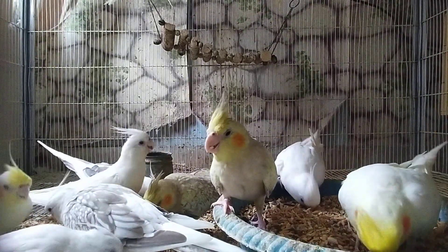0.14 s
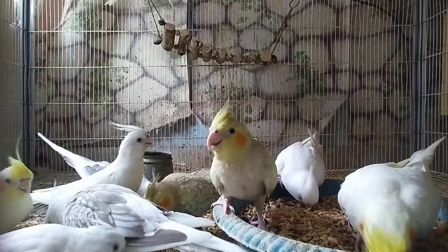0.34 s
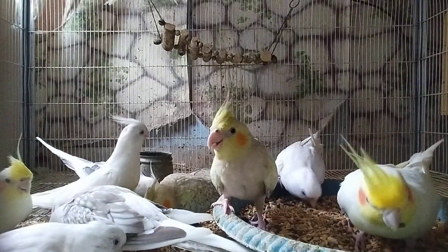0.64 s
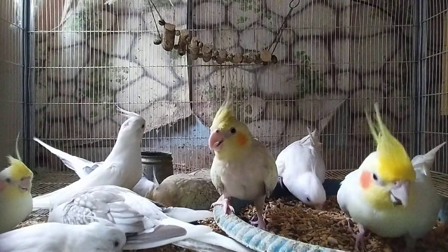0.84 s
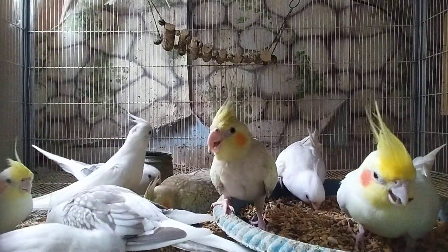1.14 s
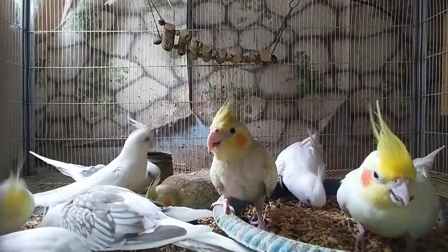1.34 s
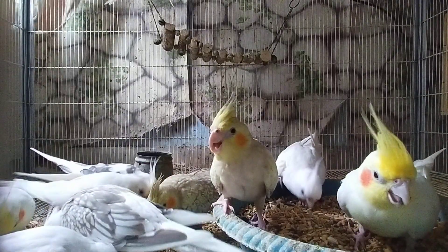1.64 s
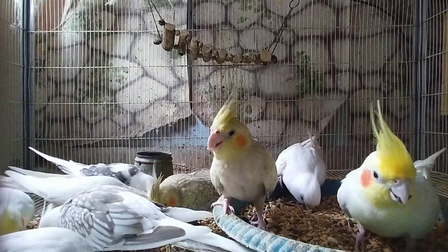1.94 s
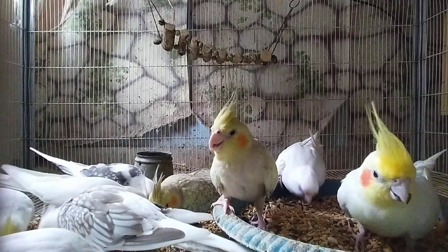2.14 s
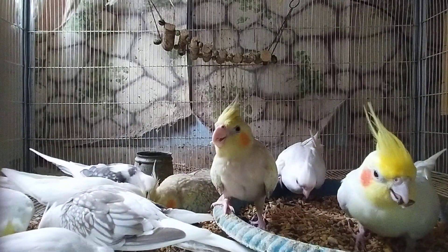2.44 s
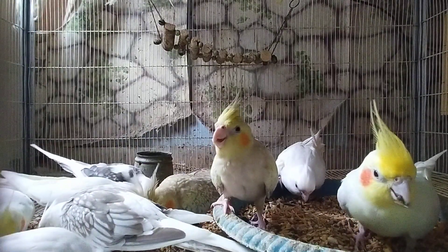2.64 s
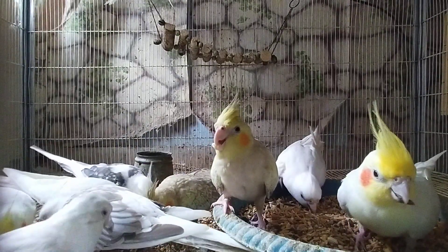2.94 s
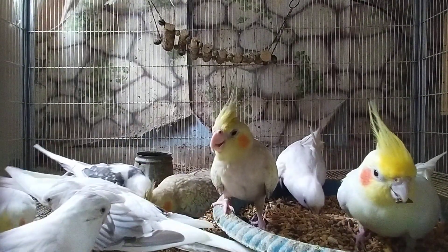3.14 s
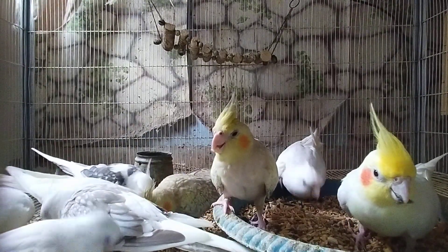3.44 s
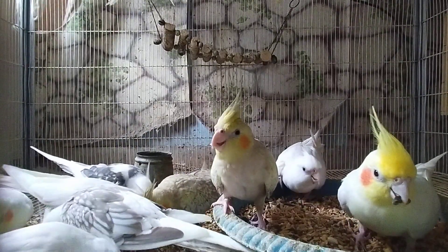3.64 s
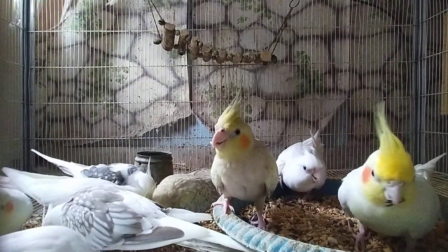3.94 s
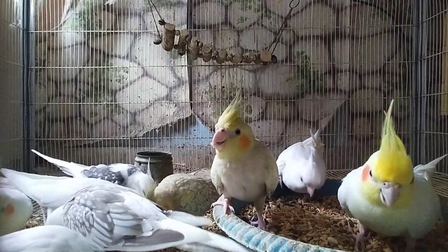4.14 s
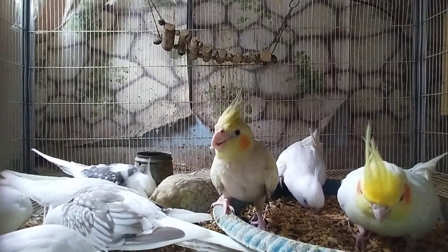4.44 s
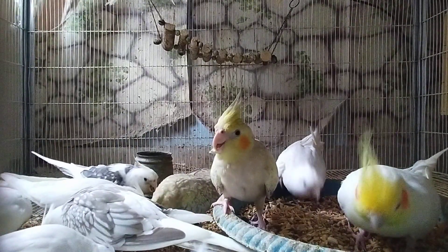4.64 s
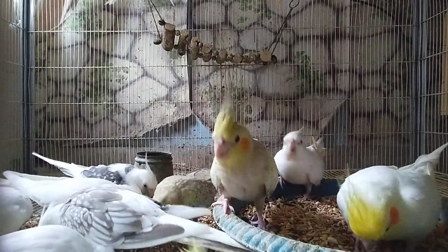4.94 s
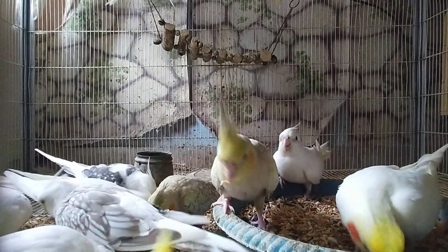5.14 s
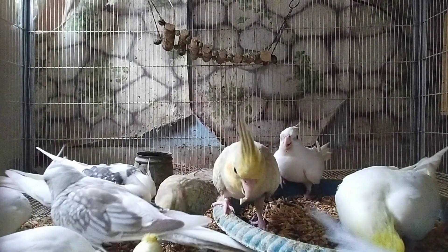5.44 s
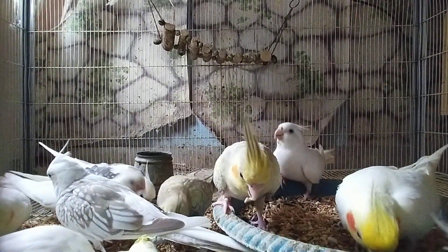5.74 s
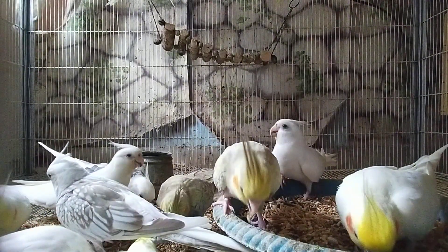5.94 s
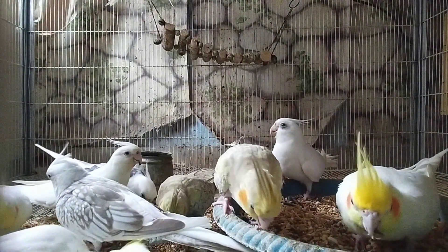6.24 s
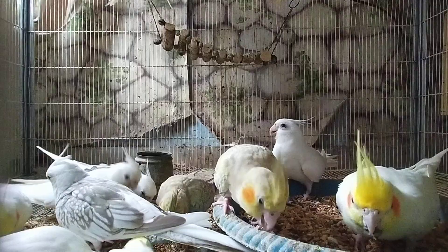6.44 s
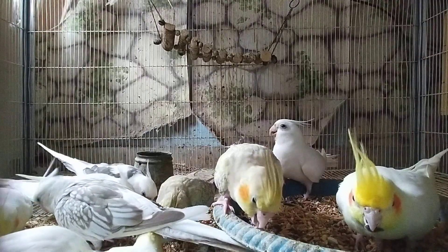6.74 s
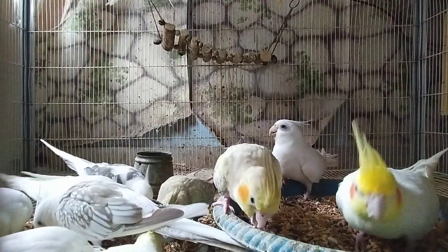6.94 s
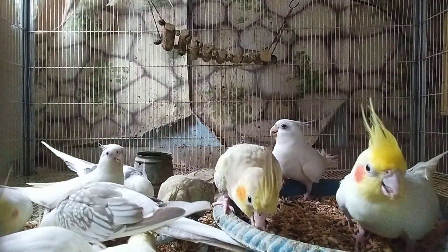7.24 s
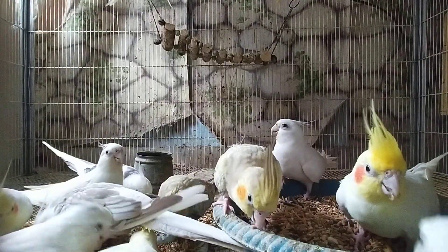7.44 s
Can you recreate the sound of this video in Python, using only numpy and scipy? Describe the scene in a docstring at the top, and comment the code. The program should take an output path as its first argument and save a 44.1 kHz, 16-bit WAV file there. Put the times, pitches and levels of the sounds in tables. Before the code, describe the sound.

Faint room noise and low rumble open the scene, with brittle seed cracks, a soft bump at 0.2 s and a light hollow tap on a tray near 0.6. A weak raspy squawk comes at 0.8, a stronger buzzing, rising one at 1.0. At 1.9 a harsh squawk runs into a loud, clear arched whistle at 2.0; another whistle follows at 2.6. A squawk at 3.15 and whistle at 3.4 lead to a lull with seed clicks, feather swishes and faint far hoots. From 5.15 to 5.9 whistles and squawks crowd together and overlap, the last one lower and softer. Bumps, sharp seed cracks and a feathery swish sit around 6.1, then quiet nibbling. Two loud overlapping whistles burst out at 7.2, and a short squawk starts at 7.5. Everything is close, in a small reflective room.

```python
"""Room noise and a low rumble are heard first, then beaks cracking seed, low bumps and a tap on a tray.
Cockatiels call in a cage in a small hard-walled room, close to the microphone: raspy, buzzing squawks and
loud, clean, arched whistles, some overlapping, with faint far hoots and swishes of feathers between.
Calls are gliding harmonic tones shaped by throat resonances; noises are filtered noise under envelopes;
bumps, taps and hoots are sines. Discrete reflections and a diffuse tail supply the room."""
import sys
import numpy as np
from scipy import signal
from scipy.fft import rfft, irfft
from scipy.io import wavfile
from scipy.ndimage import uniform_filter1d

SR = 44100
rng = np.random.default_rng(int(sys.argv[2]) if len(sys.argv) > 2 else 0)


def materialize(psi):
    """Save the field psi as 16-bit PCM at rate SR to the path in sys.argv[1].

    A 1-D psi becomes a single channel; in a 2-D psi each row is a channel.
    """
    bounded = np.clip(np.atleast_2d(psi).T, -1, 1)
    quanta = np.round(bounded * 32767).astype(np.int16)
    wavfile.write(sys.argv[1], SR, quanta)


N = 335160  # length [samples]


def gain_of(db):
    """Level definition: an amplitude ratio is 10 to the power of decibels over 20."""
    return 10 ** (np.asarray(db) / 20)


def evened(x):
    """Power normalisation: scales a signal to rms 1."""
    return x / np.sqrt(np.mean(x ** 2) + 1e-20)


def read(points, hz):
    """Logarithmic frequency scale: interpolates a table's values between its frequencies."""
    f, value = np.transpose(points)
    return np.interp(np.log(hz + 1), np.log(f + 1), value)


def add(mix, s, sound):
    """Superposition: adds a sound to the mix, in place, from time s."""
    part = mix[max(round(s * SR), 0):][:len(sound)]
    part += sound[:len(part)]


def noise(colour):
    """Spectral shaping: white noise is weighted by a spectrum, then scaled to rms 1."""
    hz = np.fft.rfftfreq(N, 1 / SR)
    spectrum = rfft(rng.standard_normal(N)) * gain_of(read(colour, hz))
    return evened(irfft(spectrum, N))


def wander(rate_hz, size=32768):
    """Band-limited random fluctuation: low-passed noise of rms 1, varying up to about rate_hz."""
    hz = np.fft.rfftfreq(size, 1 / SR)
    spectrum = rfft(rng.standard_normal(size)) * np.exp(-(hz / rate_hz) ** 2)
    return evened(irfft(spectrum, size))


# spectrum of the steady room noise: (frequency [Hz], relative density [dB])
AIR_SPECTRUM = [(24, -41), (40, -35.5), (106, -10), (256, 3), (491, -8.5), (790, -11.5), (896, -13.5),
                (1210, -10.5), (2570, -25.5), (4030, -37), (6170, -44), (7540, -36.5), (11600, -49.5),
                (14800, -37), (16000, -45)]


def room_noise(level_db=-42):
    """Stationary noise: a constant spectrum at a constant rms level."""
    return gain_of(level_db) * noise(AIR_SPECTRUM)


# spectrum of movement near the microphone: (frequency [Hz], relative density [dB])
RUMBLE_SPECTRUM = [(21, -54.5), (35, -37.5), (84, -5), (119, 0.5), (166, -3.5), (291, -16), (456, -28.5),
                   (496, -38), (600, -25.5), (780, -56), (1320, -120)]
# its louder swells: (time [s], relative peak level [dB], time to fall 10 dB [s])
RUMBLE_SWELLS = [(.08, -33, 0.12), (.23, -26.5, 0.08), (.7, -36, .12), (.88, -35, .04), (1.195, -21.5, .05),
                 (1.41, -37.5, 0.2), (1.69, -34, 0.13), (1.98, -31.5, .08), (2.86, -32.5, 0.05),
                 (3.43, -28, 0.06), (4.51, -32.5, 0.02), (4.68, -29, 0.07), (4.99, -32.5, 0.05),
                 (5.74, -37, 0.25), (6.1, -25, 0.06), (6.58, -29.5, 0.05), (6.77, -32, 0.1),
                 (6.94, -31, 0.1)]
REST_DB, RESTLESS_DB, RESTLESS_HZ = -46.5, 3.5, 5.8  # faint stirring: relative level, spread, rate


def rumble(level_db=-2):
    """Amplitude modulation: low noise follows the higher of a restless floor and each swell."""
    t = np.arange(N) / SR
    stir_db = REST_DB + RESTLESS_DB * wander(RESTLESS_HZ, size=N)
    for s, db, width in RUMBLE_SWELLS:
        stir_db = np.maximum(stir_db, db - 10 * abs(t - s) / width)
    return gain_of(stir_db + level_db) * noise(RUMBLE_SPECTRUM)


# beaks cracking seed: (time [s], relative level [dB])
SEED_CRACKS = [(0.0844, -36), (0.1694, -43), (0.316, -38.5), (0.3631, -44), (0.569, -42), (1.4174, -44),
               (1.5988, -47), (2.2468, -29), (2.394, -38), (2.9386, -35.5), (2.9791, -32), (4.0824, -36),
               (4.1214, -36.5), (4.187, -39.5), (4.2268, -37), (4.291, -36.5), (4.3144, -42.5),
               (6.118, -30), (6.128, -25), (6.142, -31), (6.5904, -37), (6.7171, -37.5), (6.7744, -38.5),
               (6.803, -36), (6.8314, -41), (6.8773, -41)]
# spectrum of cracks and crumbs: (frequency [Hz], relative level [dB])
CRACK_SPECTRUM = [(1000, -21.5), (3000, -19), (5000, -6), (7800, -0.5), (10500, -12.5), (13000, -1),
                  (15500, 5.5)]


def seeds(level_db=-7, decay_s=0.0036, crumbs_per_s=16, crumb_db=-60):
    """Impulsive excitation: cracks and random husk crumbs become decaying bursts of noise."""
    force, t = np.zeros(N), np.arange(SR // 30) / SR
    for s, db in SEED_CRACKS:
        add(force, s, gain_of([db + level_db]))
    falls = rng.random(N) < crumbs_per_s / SR
    force += falls * gain_of(crumb_db + 4 * rng.standard_normal(N))
    envelope = signal.oaconvolve(force, np.exp(-t / decay_s))[:N]
    return envelope * noise(CRACK_SPECTRUM)


# soft bumps: (time [s], relative level [dB], pitch [Hz])
SOFT_BUMPS = [(0.221, -22.5, 151), (1.982, -26, 103), (3.414, -24, 120), (4.972, -21, 136),
              (6.073, -21, 119.7), (6.576, -20.5, 110)]


def bumps(level_db=-1, rise_s=0.0065):
    """Damped oscillation: a few low cycles swell and die under a critically damped envelope."""
    out, t = np.zeros(N), np.arange(SR // 8) / SR
    for s, db, hz in SOFT_BUMPS:
        envelope = t / rise_s * np.exp(1 - t / rise_s)
        add(out, s - .004, gain_of(db + level_db) * envelope * np.sin(2 * np.pi * hz * t))
    return out


# a beak tapping the tray: (time [s], direct peak level [dB])
TRAY_TAPS = [(.589, -28.5)]
# modes of the tray: (frequency [Hz], relative level [dB], time to fall 60 dB [s])
TRAY_MODES = [(600, -2, 0.057), (1110, -4, 0.059), (1365, 4, 0.032), (2540, -9, .03)]


def taps():
    """Modal synthesis: a light peck sounds the tray's modes as exponentially decaying sines."""
    out, t = np.zeros(N), np.arange(SR // 10) / SR
    ring = sum(gain_of(db - 60 * t / t60) * np.sin(2 * np.pi * hz * t) for hz, db, t60 in TRAY_MODES)
    for s, db in TRAY_TAPS:
        add(out, s, gain_of(db) * ring / abs(ring).max())
    return out


# colour that throat and beak give the overtones: (frequency [Hz], gain [dB])
THROAT_RESPONSE = [(600, -48), (1600, -14), (2500, 4), (3600, 2.5), (4600, -5), (5400, -9), (6200, -5.5),
                   (7200, -1), (8800, -3), (9600, -13.5), (10300, -2), (12500, -7.5), (14500, 1),
                   (16200, -11.5)]
SHRILL_HZ, SHRILL_WIDTH_HZ = 14900, 1300  # the top resonance, its strength set call by call


def throat(hz, shrill_db):
    """Source-filter principle: gain in dB of throat and beak, with a variable top resonance."""
    return read(THROAT_RESPONSE, hz) + shrill_db * np.exp(-((hz - SHRILL_HZ) / SHRILL_WIDTH_HZ) ** 2 / 2)


def rush(fall_db, shrill_db, knee_hz=4500, size=32768):
    """Turbulence noise: air coloured by the throat, losing fall_db per octave above the knee."""
    hz = np.fft.rfftfreq(size, 1 / SR)
    colour_db = throat(hz, shrill_db) - fall_db * np.log2(np.maximum(hz / knee_hz, 1))
    return irfft(rfft(rng.standard_normal(size)) * gain_of(colour_db), size)


def glide(scoop_s, climb_s, fall_s, first_hz, knee_hz, top_hz, last_hz, bend, ease=1.3):
    """Pitch contour: time and frequency of a scoop, an easing climb and a fall steepened by bend."""
    t = np.arange(0, scoop_s + climb_s + fall_s + .004, 1 / SR)
    scoop = np.clip(t / scoop_s, 0, 1)
    climb = np.clip((t - scoop_s) / climb_s, 0, 1)
    fall = np.clip((t - scoop_s - climb_s) / fall_s, 0, 1)
    hz = first_hz + (knee_hz - first_hz) * scoop + (top_hz - knee_hz) * (1 - (1 - climb) ** ease)
    hz = hz + (last_hz - top_hz) * (fall ** 2 + fall ** bend) / 2
    return t, uniform_filter1d(hz, size=440, mode="nearest")  # muscles round the turns of pitch


def gate(t, attack_s, release_s):
    """Amplitude envelope: linear attack, hold and linear release."""
    return np.clip(np.minimum(t / attack_s, (t[-1] - t) / release_s), 0, 1)


def opening(t, length_s):
    """Onset transient: 1 at the start of a call, dropping toward 0 around length_s."""
    return np.exp(-(t / length_s) ** 4)


# how strongly the fundamental carries at each pitch: (frequency [Hz], gain [dB])
FUNDAMENTAL_CARRY = [(1250, -23), (1600, -15), (1850, -10), (2200, -6.5), (2550, -6.5), (2950, 0),
                     (3150, -2.5)]
BUZZ_DEPTH, JITTER = .03, .016  # shares of pitch that shake at full rasp
GRIT = .33  # share of overtone amplitude that shakes at rasp 1


def chirp(t, hz, tone_db, source_db, rasp, fall_db, shrill_db, buzz_hz=105, tremor=.004,
          flutter=0.61, slack_db=14, rush_db=-3, count=12):
    """Harmonic synthesis: the syrinx sweeps a tone that buzz, jitter and turbulence roughen with rasp."""
    # a clean call dulls where its pitch sags
    fall_db = fall_db + slack_db * np.maximum(1 - rasp, 0) * (1 - hz / hz.max())
    drift, shake, waver, swell = (wander(rate)[:len(t)] for rate in (60, 450, 120, 250))
    buzz = np.sin(2 * np.pi * np.cumsum(buzz_hz * (1 + .2 * drift)) / SR)
    tone_db = tone_db + read(FUNDAMENTAL_CARRY, hz)
    roughness = np.minimum(rasp, 1) * (BUZZ_DEPTH * buzz + JITTER * shake)
    hz = hz * (1 + roughness + tremor * waver)
    phase = 2 * np.pi * np.cumsum(hz) / SR
    voice = gain_of(tone_db) * np.sin(phase)
    for k in range(2, count):  # overtones slide through the throat's resonances
        level_db = source_db - fall_db * (k - 2) + throat(k * hz, shrill_db)
        level_db += 3.5 * wander(110)[:len(t)]  # each one flickers on its own
        grit = 1 + GRIT * rasp * wander(600)[:len(t)]  # and is smeared by turbulence
        audible = k * hz < SR / 2  # nothing above half the sample rate
        voice += gain_of(level_db) * grit * np.sin(k * phase) * audible
    air = rush(fall_db.min(), shrill_db)[:len(t)]
    voice += rasp * gain_of(source_db - fall_db + rush_db) * air
    throb = np.exp(rasp * flutter * (buzz + 1.8 * np.tanh(swell)) / 2)
    return np.sqrt(2) * voice * throb


# squawks start low, climb and droop, fading after a harsh start:
# (start [s], climb [s], fall [s], first pitch [Hz], top pitch [Hz], relative level [dB],
#  relative overtone level [dB], extra overtones at the start [dB], harsh time [s], change by the end [dB],
#  rasp [1 = full], base rolloff per overtone [dB], room re direct [dB], shrillness [dB])
SQUAWK_CALLS = [(.785, 0.049, 0.082, 1297, 1490, -31, -58, 4, .11, -6, .9, 9, -5, -8),
                (1.034, .14, 0.079, 1300, 2200, -17, -40.5, 0.5, .12, -6, 1, 5.1, -8.5, -22),
                (1.892, .145, 0.018, 1600, 2040, -14.5, -45, 10, .115, -12, 1.1, 3.5, -3.5, 6),
                (3.145, 0.13, 0.028, 1270, 2170, -16.5, -44, 8, .115, -14, .75, 4, -6, 9),
                (5.236, .07, .085, 1620, 2460, -12, -48, 15.5, .062, -7, .9, 8.5, -5.5, 15),
                (5.534, 0.14, 0.049, 1350, 2130, -19, -39.5, 4, .15, -3, .92, 4.5, -6, 3),
                (7.478, .005, .03, 1600, 1780, -8, -44, 2, .03, -10, .9, 5, -7, 12)]
SQUAWK_SCOOP_S, SQUAWK_BEND = .02, 1.2
SQUAWK_KNEE, SQUAWK_DROOP = 1.1, .77  # knee: times the first pitch; end of the droop: times the top
SQUAWK_FULL_HZ, SQUAWK_WEAK_DB_PER_HZ = 1420, .05  # below this pitch the voice is still weak
SQUAWK_SWELL_DB = 3.5  # the fundamental is this much weaker while the call is harsh


def squawk(start, climb_s, fall_s, first_hz, top_hz, level_db, over_db, bite_db, harsh_s, fade_db,
           rasp, rolloff_db, room_db, shrill_db):
    """Rough phonation: a rising, overtone-rich call that loses force; (start, sound, room level)."""
    t, hz = glide(SQUAWK_SCOOP_S, climb_s, fall_s, first_hz, SQUAWK_KNEE * first_hz, top_hz,
                  SQUAWK_DROOP * top_hz, SQUAWK_BEND, ease=1.05)
    weakness_db = np.maximum(SQUAWK_FULL_HZ - hz, 0) * SQUAWK_WEAK_DB_PER_HZ
    effort_db = fade_db * (t / t[-1]) ** 3 - weakness_db
    bite = opening(t, harsh_s)
    tone_db = level_db + effort_db - SQUAWK_SWELL_DB * bite
    source_db = over_db + effort_db + bite_db * bite
    voice = chirp(t, hz, tone_db, source_db, rasp, rolloff_db, shrill_db)
    return start, voice * gate(t, attack_s=.012, release_s=.012), room_db


# faint far hoots: (start [s], length [s], first pitch [Hz], last pitch [Hz], relative level [dB])
FAR_HOOTS = [(1.283, 0.61, 414, 430.6, -48), (2.613, 0.11, 435.4, 408, -33.5),
             (2.854, .14, 400.6, 438, -42.5), (3.252, 0.088, 274.4, 353, -39.5),
             (4.203, 0.31, 429.5, 395.7, -41.5)]


def hoots(waver=.015):
    """Frequency modulation: soft, nearly pure tones glide and waver slightly."""
    out = np.zeros(N)
    for s, length, first_hz, last_hz, db in FAR_HOOTS:
        hz = np.linspace(first_hz, last_hz, int(length * SR))
        hz = hz * (1 + waver * np.resize(wander(40), len(hz)))
        tone = np.sqrt(2) * np.sin(2 * np.pi * np.cumsum(hz) / SR)
        add(out, s, gain_of(db) * tone * signal.windows.tukey(len(hz), .6))
    return out


# whistles scoop to a knee, climb to the top and fall away; each starts reedy:
# (start [s], scoop [s], climb [s], fall [s], knee pitch [Hz], top pitch [Hz], bend of the fall [exponent],
#  relative level [dB], relative overtone level [dB], extra overtones at the start [dB], reedy time [s],
#  rasp after the start [1 = full], shrillness [dB])
WHISTLE_CALLS = [(2.021, .058, 0.056, .097, 2989, 3015, 12, -7.5, -43.5, 13, .048, .05, 13.5),
                 (2.637, .027, .073, .093, 2620, 3055, 3.5, -9.5, -44.5, 9, .02, 0.042, -3),
                 (3.416, .043, .123, .075, 2800, 3070, 5, -10, -45, 12, .022, .06, 16.5),
                 (5.158, .047, .086, .095, 2850, 3000, 3.6, -8.5, -46.5, 13, .02, .05, 21),
                 (5.596, .018, .091, 0.089, 2100, 2630, 3, -11, -53, 15, .055, .33, 0),
                 (5.793, .008, .02, .056, 1998, 2220, 1.2, -18.5, -56, 11, .01, .45, 8.5),
                 (7.229, .063, .052, .104, 2320, 2930, 2.6, -11.5, -50.5, 19, .074, .36, 19),
                 (7.236, .018, .122, .130, 2030, 2490, 3, -12.5, -55, 11, .04, .7, 15)]
# overtones gain as pitch sinks below the pure register: (frequency [Hz], gain [dB])
LOW_PITCH_REEDINESS = [(1550, 12), (1900, 4), (2300, -1), (3100, 0)]
WHISTLE_FIRST_HZ, WHISTLE_LAST_HZ = 1689, 1597
WHISTLE_ROLLOFF_DB, WHISTLE_ROOM_DB = 5.4, -11  # base rolloff per overtone; room re direct
WHISTLE_SWELL_DB = 4.5  # the tone is this much weaker while it is reedy
WHISTLE_BITE_RASP = .25  # rasp gained in the reedy start


def whistle(start, scoop_s, climb_s, fall_s, knee_hz, top_hz, bend, level_db, over_db, bite_db,
            reedy_s, rasp, shrill_db, release_s=0.0061):
    """Tonal phonation: an arched call turns from reedy to purer; (start, sound, room level)."""
    t, hz = glide(scoop_s, climb_s, fall_s, WHISTLE_FIRST_HZ, knee_hz, top_hz,
                  WHISTLE_LAST_HZ, bend, ease=1.35)
    bite = opening(t, reedy_s)
    tone_db = level_db - WHISTLE_SWELL_DB * bite
    source_db = over_db + bite_db * bite + read(LOW_PITCH_REEDINESS, hz) * (1 - bite)
    roughness = rasp + WHISTLE_BITE_RASP * bite
    voice = chirp(t, hz, tone_db, source_db, roughness, WHISTLE_ROLLOFF_DB, shrill_db)
    return start, voice * gate(t, attack_s=.006, release_s=release_s), WHISTLE_ROOM_DB


# swishes of feathers: (start [s], length [s], relative level [dB])
FEATHER_SWISHES = [(3.269, 0.37, -50.5), (3.929, 0.083, -62.5), (4.609, .13, -52.5), (6.037, .15, -49),
                   (6.894, 0.31, -54)]
# their spectrum: (frequency [Hz], relative level [dB])
FEATHER_SPECTRUM = [(1500, -22.5), (2400, -6.5), (3000, -1.5), (4100, -17.5), (6000, -10), (7400, 0),
                    (8800, -12.5), (10500, -27.5), (15000, -25)]


def feathers(patchy_db=4):
    """Friction noise: short swells of hiss, grainy as the vanes catch on each other."""
    level = np.zeros(N)
    for s, length, db in FEATHER_SWISHES:
        add(level, s, gain_of(db) * np.hanning(int(length * SR)))
    return level * gain_of(patchy_db * wander(150, size=N)) * noise(FEATHER_SPECTRUM)


# first reflections off floor, tray and walls: (delay [s], amplitude gain [ratio])
EARLY_ECHOES = [(.0019, 0.17), (.0043, -0.078), (.0078, 0.27), (0.0095, -.13), (0.0166, 0.2)]


def reflections(x):
    """Comb filtering: near surfaces return delayed copies, which beat against a gliding tone."""
    out = x.copy()
    for delay, gain in EARLY_ECHOES:
        add(out, delay, gain * x)
    return out


# reverberation of the room: (frequency [Hz], time to fall 60 dB [s])
ROOM_DECAY = [(300, .4), (1800, 0.22), (3000, 0.32), (4200, 0.18), (7000, 0.33), (15000, 0.11)]


def room(x, onset_s=0.0032):
    """Diffuse reverberation: convolution with a noise tail whose bands die at their own speeds."""
    hz, t, z = signal.stft(rng.standard_normal(SR), SR, nperseg=256)
    decay = gain_of(-60 * t / read(ROOM_DECAY, hz)[:, None])
    tail = signal.istft(z * decay, SR, nperseg=256)[1]
    tail = tail * np.clip(np.arange(len(tail)) / SR / onset_s - .5, 0, 1)
    return signal.fftconvolve(x, tail / np.linalg.norm(tail))[:N]


def scene(birds_db=0, small_room_db=-7, hoot_direct_db=-7, hoot_room_db=-3):
    """Superposition of direct and reverberant fields: birds and the sounds around them."""
    direct, sent = np.zeros(N), np.zeros(N)
    calls = [whistle(*row) for row in WHISTLE_CALLS] + [squawk(*row) for row in SQUAWK_CALLS]
    for s, call, room_db in calls:
        wet = gain_of(room_db)
        call = call * gain_of(birds_db) / np.hypot(1, wet)  # direct and room sound share the power
        add(direct, s, call)
        add(sent, s, wet * call)
    small, far = seeds() + taps() + feathers(), hoots()
    near = reflections(direct) + small + gain_of(hoot_direct_db) * far
    near = near + bumps() + room_noise() + rumble()
    sent = sent + gain_of(small_room_db) * small + gain_of(hoot_room_db) * far
    return (near + room(sent))[None]


def record(dry, low_cut_hz=58, ceiling_db=-7, recovery_db_per_s=90, edge_hz=16100):
    """Filtering and dynamic compression: a low cut, a quick limiter on loud peaks, a band limit."""
    x = signal.sosfilt(signal.butter(3, low_cut_hz, "highpass", fs=SR, output="sos"), dry[0])
    # the peak of a sine is 3 dB above its short-time rms
    peak_db = 10 * np.log10(2 * abs(uniform_filter1d(x ** 2, size=130)) + 1e-12)
    fall = np.arange(N) * recovery_db_per_s / SR
    held_db = np.maximum.accumulate(peak_db + fall) - fall  # rises at once, recovers steadily
    over_db = np.maximum(held_db - ceiling_db, 0)
    x = x / gain_of(uniform_filter1d(over_db, size=90))
    band_limit = signal.firwin(511, edge_hz, window=("kaiser", 9), fs=SR)
    return signal.oaconvolve(x, band_limit, "same")[None]


dry = scene()
out = record(dry)
materialize(out)
```